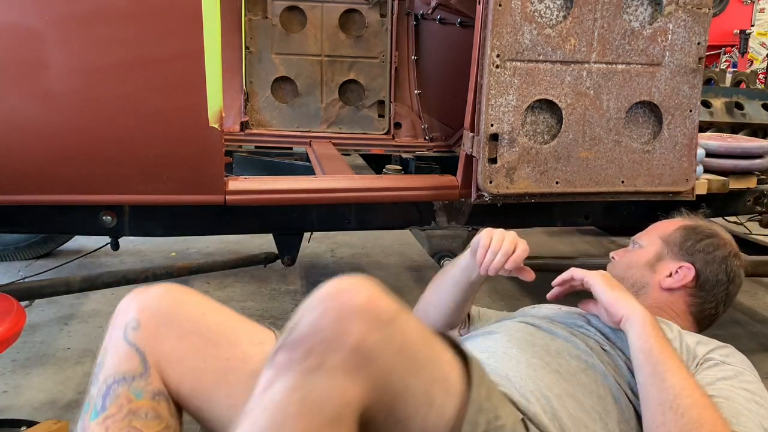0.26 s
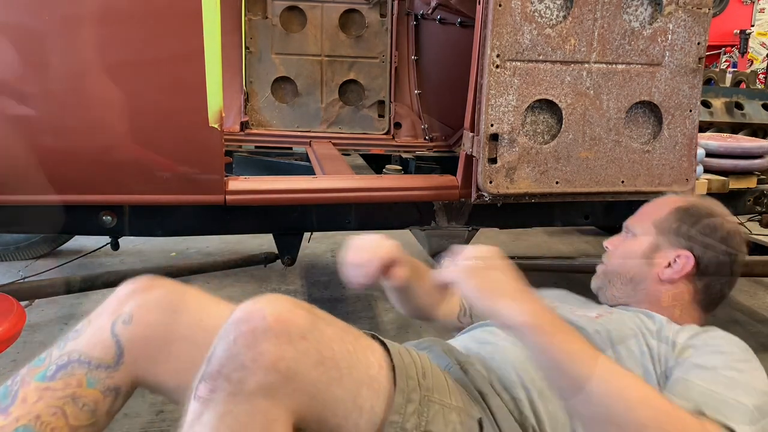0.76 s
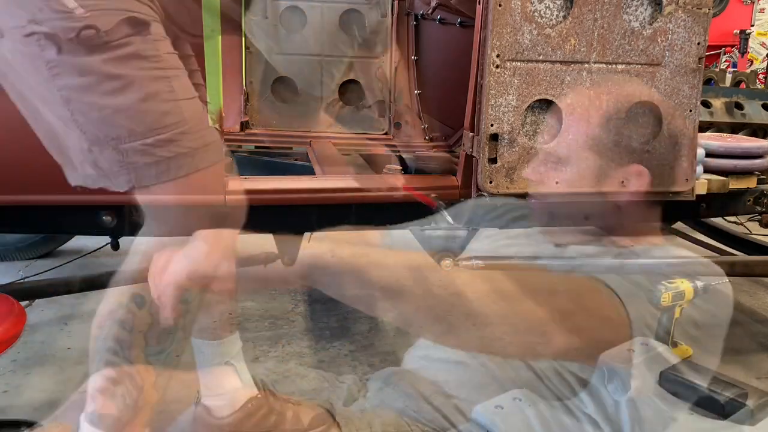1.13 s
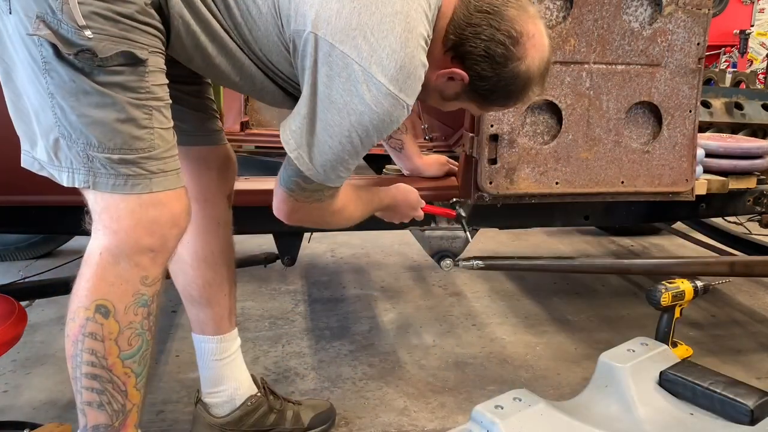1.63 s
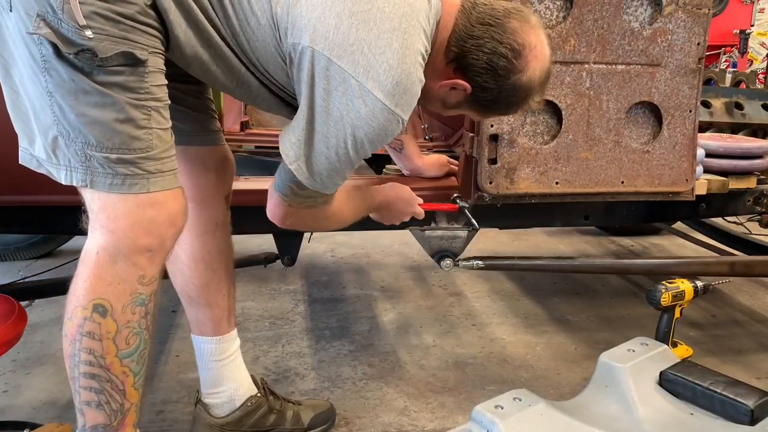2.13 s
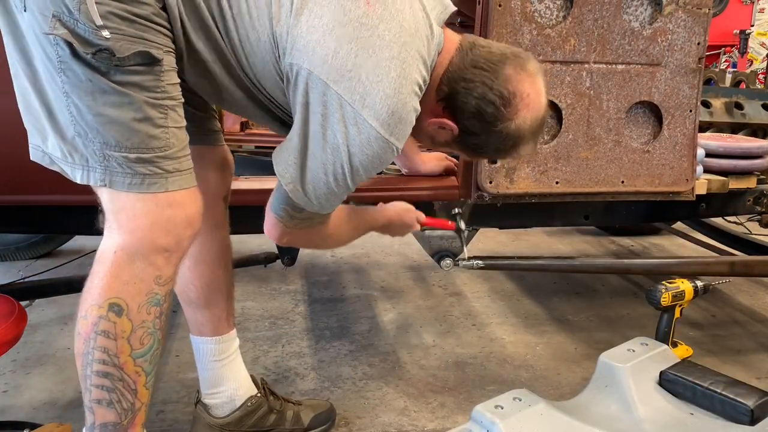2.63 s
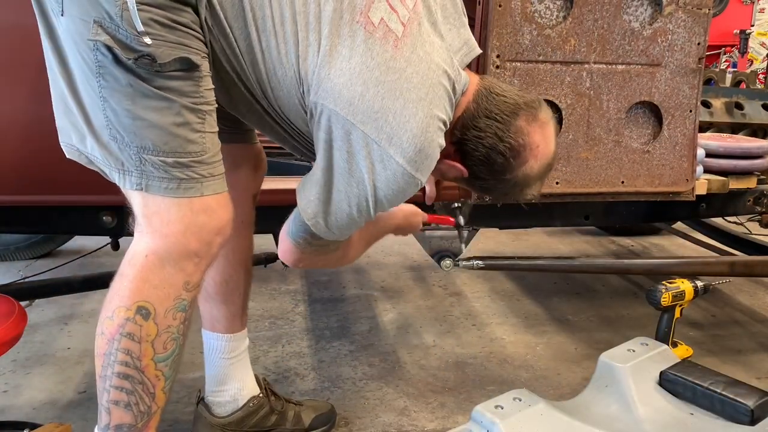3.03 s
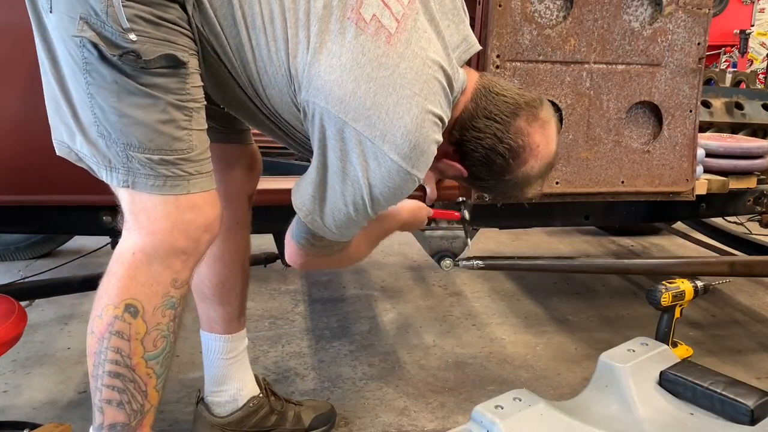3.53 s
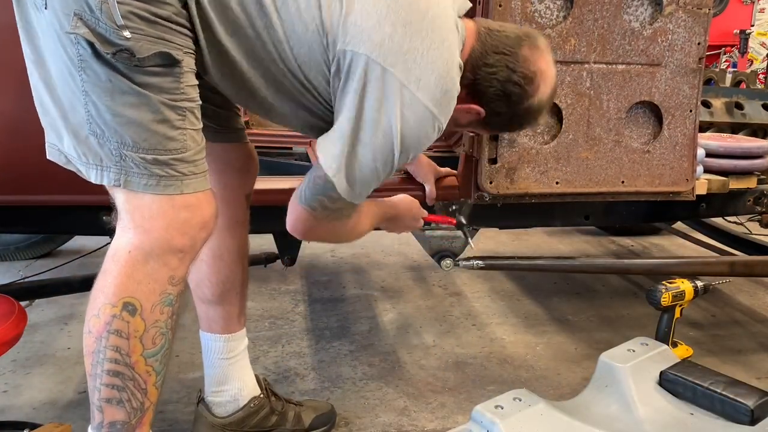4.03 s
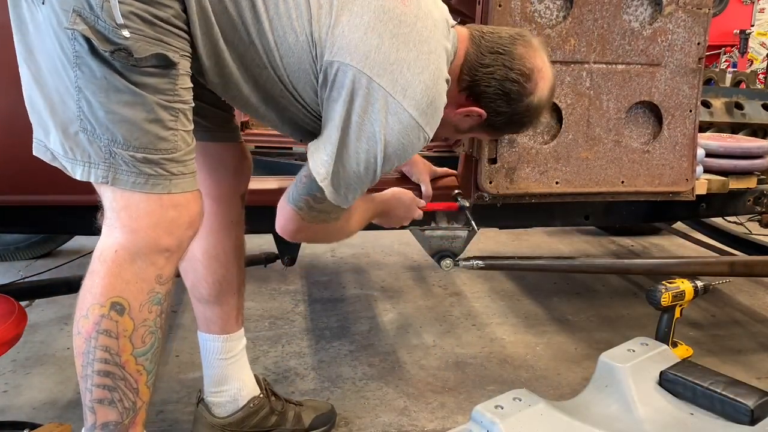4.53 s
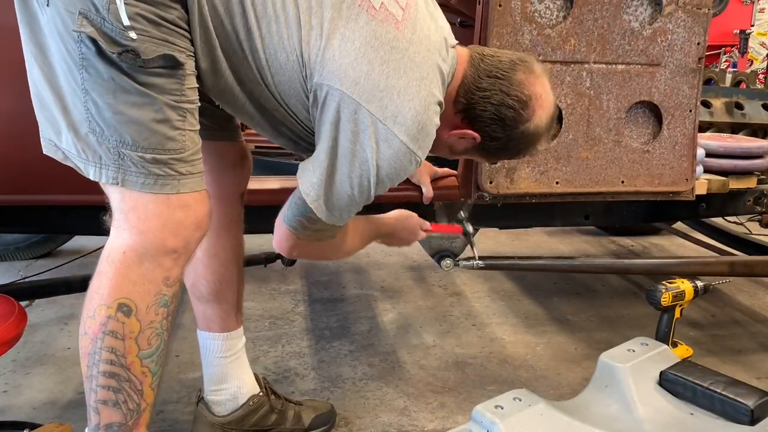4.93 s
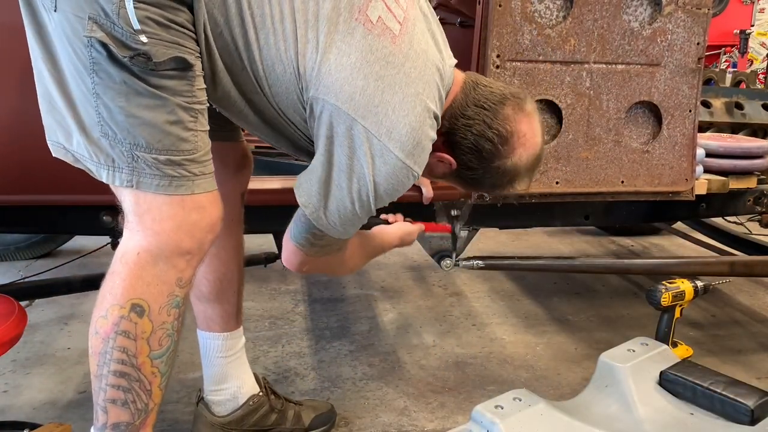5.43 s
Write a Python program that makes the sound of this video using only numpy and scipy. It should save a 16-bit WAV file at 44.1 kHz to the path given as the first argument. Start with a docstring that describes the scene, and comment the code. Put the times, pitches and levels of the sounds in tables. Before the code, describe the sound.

A quiet garage with a low, steady room noise. In the first 1.2 seconds someone shifts on a rolling board: dull rumbles at the start and around 0.5 and 0.8 seconds, light scuffs, and small woody knocks, the strongest a low thump at 0.35. A faint smooth air hiss runs until it shuts off at about 0.35. After a near pause, a hammer starts at 1.4 seconds with a strong clank, its loudest blow just after 1.5, then rattles at about ten blows a second until 2.6. After a brief gap, a second run from 2.8 to 4.0 is faster, up to fifteen a second, ringing brighter from 3.4. A third run goes from 4.15 to the end near 5.6, loosening slightly. Each blow is a smeared, gritty burst of metallic panel ringing, ticks and hiss with a lingering low boom, close and slightly left, with short reverberation.

```python
"""Rapid hammering on a car body

In a home garage smeared hammer blows fall on steel, ten to fifteen a second in three runs.
Each blow is noise, ticks and panel modes under a swelling and fading envelope; its bass booms on longer.
Before they start, filtered noise hisses away as air and rumbles as a rolling board someone shifts on;
damped sines make small knocks, over the steady noise of a quiet room."""
import sys
import numpy as np
from scipy import signal
from scipy.fft import rfft, irfft
from scipy.io import wavfile
from scipy.ndimage import uniform_filter1d

SR = 44100
rng = np.random.default_rng(int(sys.argv[2]) if len(sys.argv) > 2 else 0)


def how_loud(loudness_db):
    """Turn decibels into a plain amplitude multiplier (0 dB gives 1, 20 dB gives 10)."""
    steps = np.asarray(loudness_db, float) / 20
    return 10 ** steps


def persist_wave(psi):
    """Save psi, clipped to +-1, as 16-bit WAV."""
    counts = np.round(np.clip(psi, -1, 1) * 32767).astype(np.int16)
    wavfile.write(sys.argv[1], SR, np.atleast_2d(counts).T)


N = 249868
T = np.arange(N) / SR  # s
HZ = np.maximum(np.arange(N // 2 + 1) * SR / N, 1)  # the bins of a whole-length spectrum

# hammer blows: (time [s], level [dB], hiss re level [dB], length [ms], favoured pitch [Hz])
BLOWS = [(1.178, -53, -3.0, 45, 1820), (1.394, -21.5, -14.5, 61.5, 664), (1.526, -14.5, -7, 26, 700),
         (1.612, -21.0, -7, 40.5, 700), (1.715, -20.0, -3.5, 32, 2140.0), (1.819, -20, -6, 37, 940),
         (1.918, -17.5, -6.5, 31.0, 730), (2.02, -22, -5.5, 39.5, 673), (2.117, -19, -5.5, 31.5, 694),
         (2.215, -23.5, -3.5, 40.5, 3040), (2.311, -22, -5.5, 35.5, 4250), (2.402, -21, -3, 33.5, 1080),
         (2.497, -20, -3.5, 34.5, 670.0), (2.592, -19.5, -3.0, 32.5, 1370), (2.79, -30, -9.5, 33, 900.0),
         (2.863, -26.5, -5.5, 35, 720), (2.925, -22.5, -5, 34, 1030), (2.985, -22.5, -3.5, 36, 1030),
         (3.049, -23, -5.5, 37.0, 600.0), (3.102, -22.5, -3.5, 34.5, 1040), (3.169, -22.5, -5, 37.5, 800.0),
         (3.24, -21.5, -5, 34, 910), (3.313, -22.5, -4, 36, 845), (3.394, -23, -5, 41.5, 2440),
         (3.471, -20, -5, 35, 2500), (3.54, -20, -6, 31.5, 2560), (3.624, -20.5, -7, 40, 2480),
         (3.707, -20.0, -5.5, 32.5, 2570), (3.792, -20.5, -4.5, 34.5, 2500),
         (3.876, -19.0, -4.5, 29.5, 2430), (3.978, -24, -2.5, 34.5, 1170), (4.138, -30.5, -10, 43.5, 1370),
         (4.211, -22, -4, 35.5, 800.0), (4.294, -19.5, -5.5, 30.5, 670.0), (4.376, -21, -7.5, 33.0, 1270.0),
         (4.459, -20, -6, 37, 790), (4.539, -22.5, -4.5, 32.5, 1400), (4.614, -20, -3.5, 27.5, 1820),
         (4.689, -22.5, -5, 39, 800.0), (4.77, -22, -3.5, 36, 4400), (4.843, -21.5, -5.0, 35, 5090.0),
         (4.919, -21, -1.5, 31.5, 600.0), (4.993, -21, -5, 36, 570), (5.076, -21, -4.5, 36, 4280.0),
         (5.161, -22.5, -2, 36, 1630), (5.249, -23.5, -3.5, 37, 1680), (5.357, -23.5, -3.5, 36.5, 1580),
         (5.433, -25.5, -5, 33, 1530), (5.496, -26.5, -7.5, 43, 2850.0), (5.553, -22.5, -5.0, 34.5, 910),
         (5.607, -25, -6, 37.5, 640)]


def noise():
    """Two uncorrelated white noises: what arrives from the front and from the sides."""
    return rng.standard_normal((2, N))


def unit(x):
    """Normalise the mean power: scale to rms 1."""
    return x / np.sqrt(np.mean(x ** 2))


def curve(table, column=1):
    """Linear interpolation in time of one column of a table."""
    return np.interp(T, [row[0] for row in table], [row[column] for row in table])


def colour(x, points):
    """Spectral shaping by (Hz, dB) points, joined straight over log frequency."""
    hz, db = np.transpose(points)
    gain_db = np.interp(np.log(HZ), np.log(hz), db)
    return irfft(rfft(x) * how_loud(gain_db), N)


def split(x, hz, kind):
    """Band division by a gentle low or high pass."""
    return signal.sosfilt(signal.butter(N=3, Wn=hz, btype=kind, fs=SR, output="sos"), x)


def ring(x, hz, width):
    """One resonance; steady noise leaves it with the level per Hz it had at the centre."""
    return signal.lfilter(*signal.iirpeak(hz, hz / width, fs=SR), x)


def walk(rate):
    """Random fluctuation: straight glides of 1 / rate s between normal levels; spread about 0.6."""
    k = int(SR / rate)
    held = np.repeat(rng.standard_normal(N // k + 1), k)
    return 0.72 * uniform_filter1d(held, k)[:N]


def air():
    """Turbulence noise: leaking air is a smooth hiss that surges a little and shuts off."""
    # spectrum of the leak: (frequency [Hz], level [dB])
    air_colour = [(500, -3), (2000, 2.5), (5500, -4.5), (9500, 2), (13000, 2), (15500, -4)]
    steady_db, surge_s, surge_db = -54, 0.31, 2.5
    shut_s, fall_db_per_s = 0.333, 310
    db = steady_db + surge_db * (T > surge_s) - fall_db_per_s * np.maximum(T - shut_s, 0)
    db = db + 0.75 * walk(5.4)
    opening = np.minimum(.3 + T / 0.02, 1)
    return unit(colour(noise(), air_colour)) * how_loud(db) * opening


def board():
    """Forced vibration: rough rolling shakes the board and its hollow; cloth and soles scuff above."""
    # rolling: (time [s], rumble level [dB], scuff re rumble [dB], hollow ring re rumble [dB])
    rolling = [(0, -42, -11, -8), (.11, -48, -9, -4), (.2, -57, -9, -14), (.34, -63.5, 11, -10),
               (.375, -55, -16, -7), (.47, -56.5, -26, -3), (.52, -50, -13, -8), (.6, -62, -7, 1),
               (.69, -48, -37, -11), (.76, -41.5, -19, 0), (.82, -43.5, -11, -1.5), (.93, -60.5, -1, 2),
               (.96, -50.5, 4.5, -4), (1.1, -66, 1.5, -1), (1.17, -63, -6, -9), (1.3, -65, -12, -2)]
    # resonances of the board: (frequency [Hz], width [Hz], level [dB])
    board_modes = [(101, 11, 10.5), (210, 51, -16), (800, 17, -39)]
    rough = noise() * how_loud(5.1 * walk(59.93))
    body = sum(how_loud(db) * ring(rough, hz, width) for hz, width, db in board_modes)
    body = unit(body + 0.33 * split(rough, 1300, "low"))
    hollow = unit(ring(rough, hz=388, width=38))
    scuff_colour = [(400, 9.5), (1000, 7.5), (2500, -4.5), (5000, -12.5), (7000, -12), (12000, -34)]
    scuff = unit(colour(noise() * how_loud(2.5 * walk(130)), scuff_colour))
    rumble_db = curve(rolling) - 200 * np.clip(T - 1.36, 0, 1)  # dies away after 1.36 s
    scuff_gain = how_loud(curve(rolling, column=2))
    hollow_gain = how_loud(curve(rolling, column=3))
    return how_loud(rumble_db) * (body + scuff_gain * scuff + hollow_gain * hollow)


def room():
    """Stationary background noise: the quiet room, coloured noise at a constant level."""
    # spectrum of the room: (frequency [Hz], level [dB])
    room_colour = [(30, 10.5), (120, 6.5), (340, 3.5), (600, -36), (1600, -17), (4500, -28), (6800, -39),
                   (10500, -32.5), (15500, -39)]
    return how_loud(-57) * unit(colour(noise(), room_colour))


def knocks():
    """Impulse response: each knock is a damped thud, a woody rattle below its pitch and a bright tick."""
    # knocks: (time [s], level [dB], settled pitch [Hz], tick re level [dB], thud decay by 60 dB [s])
    taps = [(0.017, -33.5, 864, -24, 0.085), (.055, -40, 400, -25, 0.045), (0.1, -41, 417, -30, 0.14),
            (0.3497, -26.5, 212, -33, 0.082), (0.357, -38, 110, -40, 0.098), (.488, -39, 800, -34, 0.036),
            (0.497, -38.5, 426, -40, 0.08), (0.574, -52, 1500, -25, .04), (.62, -44, 807, -34, 0.11),
            (.664, -58, 1500, -2, .02), (.729, -55, 1320, -27, 0.035), (0.777, -37, 1280, -30, 0.033),
            (0.936, -45, 297, -42.5, 0.06), (0.951, -38, 1610, -8, 0.03)]
    out, t = np.zeros((2, N)), T[:int(.2 * SR)]
    for s, db, hz, tick_db, t60 in taps:
        fade = np.exp(-np.log(1000) * t / t60) * (1 - np.exp(-t / 0.00029))
        grit = rng.standard_normal((2, 2, len(t)))
        # a soft contact spreads, so low thuds fall in pitch
        drop = 1.87 * (200 / hz) ** 2 * 0.0016 * (1 - np.exp(-t / 0.00059))
        thud = np.sin(2 * np.pi * hz * (t + drop))
        rattle = 0.27 * unit(ring(grit[0], hz * 0.44, hz * 0.37))
        tick = how_loud(tick_db) * split(grit[1], 3500, "high") * np.exp(-t / 0.0023)
        start = int(s * SR)
        out[:, start:start + len(t)] += how_loud(db) * ((thud + rattle) * fade + tick)
    return out


def garage(x):
    """Reverberation: convolution with a diffuse, decaying noise tail whose treble dies first."""
    t60_s, tail_db = 0.32, -12
    t = T[:int(.6 * SR)]

    def decay(t60):
        """Exponential decay of a diffuse field."""
        return rng.standard_normal((2, len(t))) * np.exp(-np.log(1000) * t / t60)

    tail = split(decay(t60_s), 498, "low") + 0.74 * decay(0.37 * t60_s)
    tail = tail / np.sqrt(np.sum(tail ** 2, axis=1, keepdims=True))
    return how_loud(tail_db) * signal.fftconvolve(x, tail, axes=1)[:, :N]


def swells(extra_db, stretch, attack, release, late_ms):
    """Amplitude envelope: the blows as rounded humps of one shape, scaled to each length."""
    rise_share, longest_rise_ms = 0.48, 19  # part of the length before the peak, and its limit
    power = np.zeros(N)
    for (s, db, _, length, _), more in zip(BLOWS, extra_db):
        # a long blow peaks early and trails off
        early = max(rise_share * length - longest_rise_ms, 0)
        rise = rise_share * length - early
        fall = (1 - rise_share) * length + early
        span = slice(max(int((s - .15) * SR), 0), int((s + .3) * SR))
        ms = 1000 * (T[span] - s) - late_ms + early
        before = np.abs(ms / rise) ** attack
        after = np.abs(ms / fall / stretch) ** release
        away = np.where(ms < 0, before, after)
        power[span] += how_loud(db + more - 8.78 * away) ** 2  # unstretched, the length ends 8.78 dB down
    return np.sqrt(power)


def clanks(steel, s, hz):
    """Selective resonance: each blow rings one region of the sheet harder than the rest."""
    out = steel.copy()
    edges = np.r_[0, ((s[1:] + s[:-1]) / 2 * SR).astype(int), N]  # halfway between blows
    for a, b, f in zip(edges, edges[1:], hz):
        out[:, a:b] += how_loud(-3) * ring(steel[:, a:b], f, width=0.11 * f)
    return out


def hammering():
    """Modal excitation: smeared blows, each swelling and fading, wake the panel modes in varying mixes."""
    # panel mode frequencies [Hz]
    panel_hz = (125, 192, 303, 348, 466, 554, 715, 777, 1025, 1153, 1262, 1396, 1556, 1750, 1906, 2103,
                2276, 2658, 2866, 3045, 3890, 4630, 5900, 6460, 6900, 10140, 10700, 14230)
    # the same modes: (width [Hz], level [dB])
    panel_modes = [(32.4, -17), (38, 2.5), (35, 0), (35.4, -10), (41.5, -3.5), (35, -19), (37.037, -4),
                   (43.2, 2), (48.6, -3.5), (45, -1.5), (54.5, 0), (110, -5), (59.4, -6.5), (59, -8.5),
                   (44, -6.5), (60, -3), (60, -8.5), (59.4, -8), (65, -22), (60.3, -31), (70, -23),
                   (70, -49), (50, -15), (70, -8), (109, -14), (70, -20), (57, -25), (80, -12)]
    # dense noise of the sheet between the modes: (frequency [Hz], level [dB])
    sheet_colour = [(25, -70), (60, -23.5), (150, -11), (500, -11), (1300, -17), (2800, -20), (5500, -26),
                    (7000, -27.5), (10000, -23), (12000, -31), (15500, -31)]
    # the blows wander over the sheet:
    # (time [s], place [-1 rim to 1 open sheet], boom re a usual blow [dB])
    blow_path = [(1.18, 0.029, -16.5), (1.39, 0.1, -5.5), (1.7, 0.037, -8), (2.1, -0.24, -7.5),
                 (2.55, -0.41, -5.5), (2.88, 0.12, -7.5), (3.2, 0.76, -6), (3.55, 0.35, -4), (3.9, 0.4, -5),
                 (4.2, -0.15, -8.5), (4.55, 0.013, -7.5), (5.0, -0.18, -5.5), (5.33, 0.64, -8),
                 (5.6, 0.69, -7.5)]
    # what modes gain from rim to open sheet: (frequency [Hz], gain [dB per unit of place])
    place_gain = [(125, -11.5), (192, -6), (303, 4), (348, 8), (466, 12), (777, -0.5), (1025, 4.5),
                  (1262, -4), (1556, 6), (2103, -5.5), (2658, -5), (4600, 1.5)]
    sheet_db, rough_db, clear_db, ticks_db = -1.5, -3, -6, -9
    boom_hz, hiss_hz, thud_hz = 510, 4400, 270  # band limits

    s, level_db, hiss_db, _, clank_hz = np.transpose(BLOWS)
    # the boom lags behind by 0.36 dB per dB over a usual blow of -23 dB
    boom_db = np.interp(s, *np.transpose(blow_path)[[0, 2]]) - 0.36 * (level_db + 23)
    mix = rng.standard_normal((len(s), len(panel_modes)))
    turn = rng.standard_normal((len(s), len(panel_modes), 2))
    grain = how_loud(1.1 * walk(400))  # grainy noise within a blow
    # single sharp ticks within the noise, on average 900 a second
    ticks = (rng.random(N) < 900 / SR) * how_loud(1.5 * rng.exponential(size=N)) * np.sign(noise())
    ticks = how_loud(ticks_db) * unit(ticks)
    sheet = unit(colour(noise() * grain + ticks, sheet_colour))
    push = noise() * grain + ticks

    place = curve(blow_path)
    rough, clear = 0, 0
    for k, (hz, (width, db)) in enumerate(zip(panel_hz, panel_modes)):
        place_db = place * np.interp(hz, *np.transpose(place_gain))
        scatter_db = 1.5 if hz < 900 else 2.6  # small high modes depend most on where the blow lands
        gain = how_loud(db + place_db + scatter_db * np.interp(T, s, mix[:, k]))
        rough = rough + ring(push * gain, hz, width)
        # each mode also rings cleanly; its phase glides to a new value at each blow
        phase = np.array([width / 12 * np.interp(T, s, turn[:, k, side]) for side in range(2)])
        tone = np.sin(2 * np.pi * hz * T + phase)
        clear = clear + gain * np.sqrt(width) * (hz / 800) ** -.3 * tone
    steel = how_loud(sheet_db) * sheet + how_loud(rough_db) * unit(rough) + how_loud(clear_db) * unit(clear)

    upper = split(clanks(steel, s, clank_hz), boom_hz, "high")
    clang = unit(split(upper, hiss_hz, "low"))
    clang = clang * swells(0 * s, stretch=1.0, attack=1.53, release=1.09, late_ms=0.97)
    hiss = unit(split(upper, hiss_hz, "high"))
    hiss = hiss * swells(hiss_db, stretch=0.85, attack=1.3, release=1.19, late_ms=-0.55)
    # the large low modes come late and die slowly
    boom = unit(split(steel, boom_hz, "low"))
    boom = boom * swells(boom_db + 0.3, stretch=2.41, attack=3.6, release=1.33, late_ms=4.1)
    # the short low punch of each blow
    thud = unit(split(steel, thud_hz, "low"))
    thud = thud * swells(boom_db - 5, stretch=0.68, attack=2.0, release=1.1, late_ms=4.6)
    return clang + hiss + boom + thud


def level_dip():
    """Amplitude modulation: the level dips briefly and comes back."""
    s, fall_ms, back_ms, depth_db = 1.567, 6, 9, -30
    away = np.abs(1000 * (T - s) / np.where(T < s, fall_ms, back_ms))
    return how_loud(depth_db * np.exp(-away ** np.where(T < s, 2.5, 1.3)))


def ports(x, lean):
    """Interference at two close microphones: in the treble sum and difference take turns to cancel."""
    # pair: (frequency [Hz], angle between sum and difference [quarter turns],
    #        share of the difference tied to the sum [1])
    pair = [(60, .1, 0), (180, .07, .2), (350, .11, .2), (860, .19, 0), (1300, .25, 0), (2000, .31, -.2),
            (2600, .35, -.4), (3100, .38, -.2), (4100, .28, -.15), (5600, .42, 0), (6300, .3, .1),
            (6750, .3, .5), (7250, .43, .7), (7750, .64, .75), (8600, 1, .75), (10950, 2, .75),
            (13450, 3, .75), (15700, 4, .75)]
    # lean to the left, negative to the right: (frequency [Hz], share of the sum at lean 1 [1])
    left_lean = [(60, 0.24), (180, 0.092), (350, 0.2), (900, 0.27), (1300, 0.19), (2000, 0.18),
                 (3000, 0.16), (5500, -0.19), (7500, -0.014)]
    front, sides = rfft(x)
    hz, turns, tied = np.transpose(pair)
    angle = np.interp(HZ, hz, turns) * np.pi / 2
    tied = np.interp(HZ, hz, tied)
    mid = np.cos(angle) * front
    side = np.sin(angle) * (np.sqrt(1 - tied ** 2) * sides - 1j * tied * front)
    lean_hz, share = np.transpose(left_lean)
    side = side + lean * np.interp(np.log(HZ), np.log(lean_hz), share) * mid
    return irfft(np.array([mid + side, mid - side]), N)


def scene():
    """Superposition of all sources at the microphone pair; the hammering leans further to its side."""
    blows, taps, floor = hammering(), knocks(), room()
    work = blows + garage(blows)
    around = taps + garage(taps) + air() + board() + floor
    return level_dip() * (ports(work, lean=0.75) + ports(around, lean=0.6))


def roll_off(x):
    """The treble ends steeply here."""
    return signal.sosfilt(signal.butter(12, 16700, fs=SR, output="sos"), x)


def record(dry):
    """Band limitation: the top is cut steeply and the microphones lose the deep bass."""
    low_pass = signal.ellip(N=10, rp=.2, rs=70, Wn=15750, fs=SR, output="sos")
    mix = split(signal.sosfilt(low_pass, dry), 43, "high")
    return roll_off(mix)


dry = scene()
out = record(dry)
persist_wave(out)
```